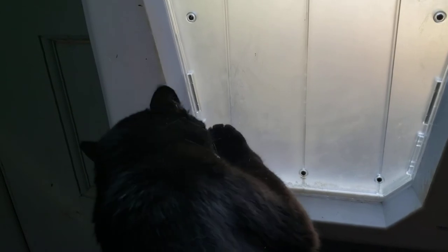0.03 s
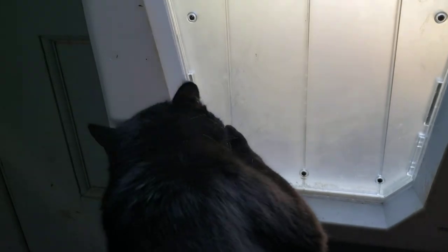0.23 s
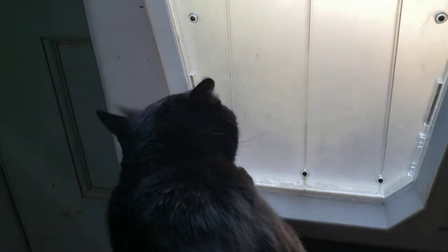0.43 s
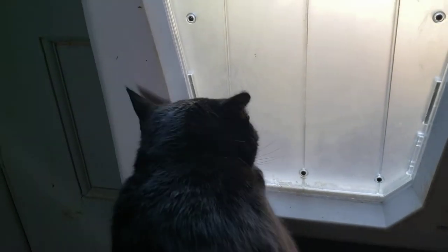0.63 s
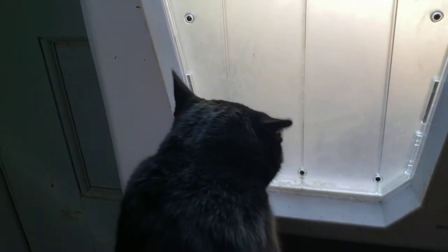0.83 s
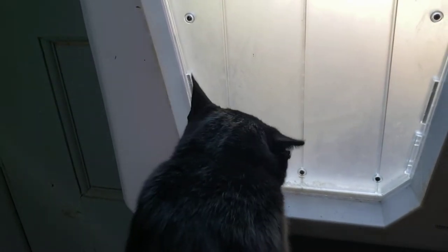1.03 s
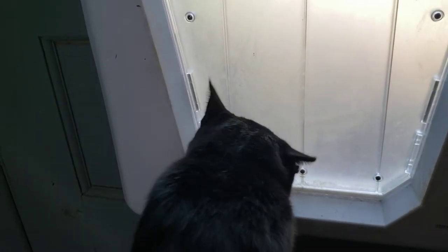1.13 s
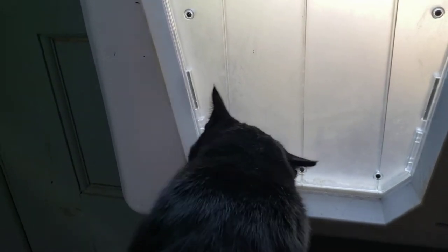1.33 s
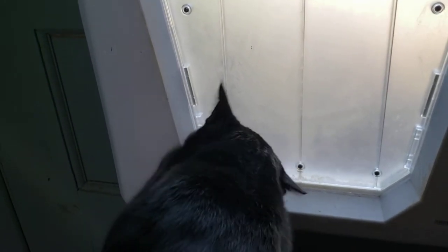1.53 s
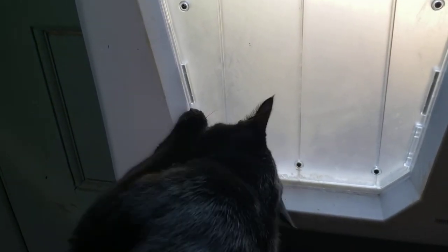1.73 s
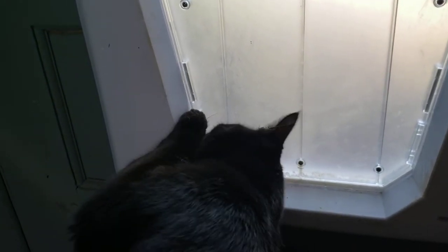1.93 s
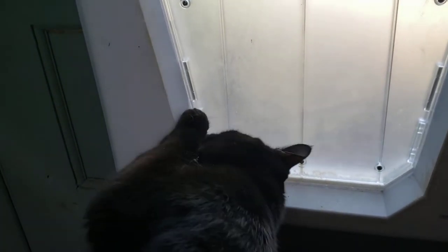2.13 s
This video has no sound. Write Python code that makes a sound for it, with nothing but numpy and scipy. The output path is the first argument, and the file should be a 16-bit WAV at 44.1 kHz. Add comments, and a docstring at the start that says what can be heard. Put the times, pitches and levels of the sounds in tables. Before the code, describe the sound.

A plastic pet door bangs and rattles as a cat paws at it, then knocks softly.

```python
"""A plastic pet door snaps and rattles against its frame as a cat paws at it, about a metre away.
Weaker knocks and scrapes of claws and pads follow, each one ringing the panel. The door around it
booms when weight lands on it, and plastic and pads squeak as they catch and slip. It all sits a little
to the left in a small hallway, over a low rumble, a hum and a faint hiss."""
import sys
import numpy as np
from scipy import signal
from scipy.fft import rfft, irfft, next_fast_len
from scipy.io import wavfile
from scipy.ndimage import uniform_filter1d

SR = 44100
rng = np.random.default_rng(int(sys.argv[2]) if len(sys.argv) > 2 else 0)


def master(y):
    """Save y as 16-bit WAV."""
    cut = np.clip(np.atleast_2d(y).T, -1, 1)
    pcm = np.round(cut * 32767)  # scale
    wavfile.write(sys.argv[1], SR, pcm.astype(np.int16))


N = 97020

# The five EQ points that voice a contact, in Hz: low, body, mid, treble, top.
CONTACT_BANDS_HZ = (330, 750, 1750, 5000, 13000)
# Hits on the panel. Each row: start in seconds, then low, body, mid, treble and top levels in dB.
KNOCKS = [ (0.2349, 21, -15, 3.5, 5.5, 16), (0.2368, 19, -1.5, 6.5, -4, 17.5), (0.2399, 20, 7, 8, 8, -6),
          (0.2521, 13, 11, 10.5, -0.5, -5), (0.2711, 16, -7, -12, -7, -16), (0.2840, 19, 0, -19, -6, -22),
          (0.529, -5, -13, -18, -16, -36), (0.741, 4, -21, -3, -15, -63), (0.834, 5.5, -3.5, 3.5, 1.5, -1),
          (0.8410, 0, -5, 4, -30, -29), (0.9352, -4, -5, -7, -8.5, -22), (1.006, -23, -5, -33, -14.5, -24),
          (1.0254, 0, -11.5, -27, -12.5, -16.5), (1.1224, 4, -16, -5.5, -8, -31),
          (1.37, -17, -18.5, -16.5, -13.5, -35), (1.389, -15.5, -14, -15, -15, -40),
          (1.6687, -10, -10.5, -1, -21, -35), (1.8835, -12, -12.5, -17, -27, -42),
          (2.01, -12.5, -46, -56, -27, -21), (2.0546, -18, -7.5, -8.5, -33, -36),
          (2.15, -9, -10.5, -12.5, -21, -32)]

def knocks():
    """The panel strikes its frame and claws strike the panel: a start and a force pulse for each hit."""
    blow = signal.unit_impulse(2048)
    return [(start, colour(blow, list(zip(CONTACT_BANDS_HZ, levels)))) for start, *levels in KNOCKS]


# Drags. Each row: start, swell and release in seconds, then low, body, mid, treble and top levels in dB.
SCRAPES = [ (0.246, 0.0018, 0.011, -12.5, -13.5, -13, -20, -16),
           (0.285, 0.088, 0.017, -50, -42, -25, -25, -41),
           (0.452, 0.0046, 0.038, -32.5, -31, -26, -39.5, -57),
           (0.524, 0.049, 0.039, -27.5, -28, -37.5, -33, -38.5),
           (0.646, 0.042, 0.04, -31, -28, -26, -37.5, -51.5),
           (0.709, 0.022, 0.056, -44, -25, -37.5, -48, -48),
           (0.827, 0.0029, 0.0097, -19.5, -41, -33, -36, -27.5),
           (0.869, 0.0082, 0.059, -29.5, -27.5, -24, -47.5, -70),
           (0.918, 0.01, 0.018, -20, -23, -37.5, -34, -41),
           (1.020, 0.054, 0.09, -46, -30.5, -33.5, -36.5, -53.5),
           (1.106, 0.0096, 0.033, -23, -25, -27.5, -34, -52.5),
           (1.200, 0.13, 0.15, -40, -44, -50.5, -50.5, -62),
           (1.430, 0.017, 0.11, -67, -73, -48, -56.5, -51.5),
           (1.654, 0.009, 0.1, -31, -36, -33, -47.5, -60.5),
           (1.74, 0.03, 0.089, -54.5, -45.5, -53.5, -54, -59),
           (1.877, 0.0081, 0.034, -33, -38, -43.5, -55, -64.5),
           (1.911, 0.0089, 0.01, -29.5, -37, -53, -74, -71),
           (2.040, 0.027, 0.035, -34, -36.5, -32, -51, -46.5),
           (2.137, 0.027, 0.04, -27.5, -39.5, -44, -52.5, -59)]
SLIPS_PER_S, SLIP_SCATTER_DB, RUB_SHARE = 900, 3, 0.56

def scrapes():
    """The panel grinds in its frame and the paw drags over it: tiny uneven slips over a smooth rub."""
    t = np.arange(SR // 3) / SR
    forces = []
    for start, swell, release, *levels in SCRAPES:
        slips = (rng.random(len(t)) < SLIPS_PER_S / SR) * rng.choice([-1, 1], len(t))
        slips = slips * undb(SLIP_SCATTER_DB * rng.standard_normal(len(t)))
        rub = rng.standard_normal(len(t))
        friction = np.sqrt(1 - RUB_SHARE) * slips / slips.std() + np.sqrt(RUB_SHARE) * rub
        pressure = np.interp(t, [0, swell, swell + release], [0, 1, 0])
        forces.append((start, colour(friction * pressure, list(zip(CONTACT_BANDS_HZ, levels)))))
    return forces


# The ring of the plastic. Each row: pitch in Hz, relative level in dB, time to fall 60 dB in seconds.
PANEL_MODES = [(278.8, 1.5, 0.7), (295.4, -7.5, 1), (331, -7, 0.3), (683, -3.5, 0.12), (783, 11, 0.093),
               (832, -11.5, 0.059), (956, -8, 0.66), (1438, 8, 0.24), (1518, -6, 0.23), (1668, 5, 0.067),
               (1808, 4.5, 0.076), (1930, 5.5, 0.078)]
# The plastic's tone on every knock and scrape. Each row: frequency in Hz, gain in dB.
PANEL_EQ = [(40, -20), (110, -7), (180, -7), (250, -6), (325, 2), (400, -6), (490, -0.5), (570, -4),
            (700, -2), (900, 5.5), (1200, -0.5), (1700, 1), (2300, 2), (3200, -3.5), (5000, -3.5),
            (7300, -1.5), (8100, -12), (10500, -7), (13000, -8.5), (15300, -3), (16200, -12.5)]
CLICK_DB, RING_DB, CHATTER_DB, ROOM_DB = -8.5, -57.5, -4.5, -7
CHATTER_T60_S, RIGHT_LAG_S = 0.042, 0.00007

def panel(contacts):
    """Each contact gives a click and a ring, plus chatter and reflections that vary with the spot."""
    out, t = np.zeros((2, N)), np.arange(SR // 2) / SR
    click = np.sinc((t - np.array([[0], [RIGHT_LAG_S]])) * SR)
    direct = undb(CLICK_DB) * click + undb(RING_DB) * ring(PANEL_MODES, t)
    chatter_decay = fade(t[:4096], CHATTER_T60_S)
    for (start, force), reflections in zip(contacts, hallway(t)):
        response = direct + undb(ROOM_DB) * reflections
        chatter = flatten(diffuse_noise(len(chatter_decay)) * chatter_decay)
        add(response, undb(CHATTER_DB) * chatter, 0)
        add(out, signal.fftconvolve(force[None], response, axes=1), start)
    return colour(out, PANEL_EQ)


# Weight landing on the door. Each row: start in seconds, level in dB.
THUMPS = [(0.236, -16), (0.52, -37.5), (0.846, -35.5), (1.118, -43.5), (1.881, -39)]
# The door's boom. Each row: pitch in Hz, relative level in dB, time to fall 60 dB in seconds.
DOOR_MODES = [(69.3, 0.5, 0.57), (56.95, -13.5, 0.85), (100, -6, 0.29), (120.5, 2, 0.11),
              (188.1, -3.5, 0.22), (223.6, -16, 0.28), (298, -16.5, 0.2), (337.4, -13.5, .2)]

def door(attack_s=0.019):
    """The whole door booms in its low modes when weight lands on it."""
    out, t = np.zeros(N), np.arange(SR) / SR
    boom = ring(DOOR_MODES, t) * (1 - np.exp(-t / attack_s))
    for start, db in THUMPS:
        add(out, undb(db) * boom, start)
    return out


# Short squeaks. Each row: start, swell and release in seconds, pitch in Hz, glide in Hz per second,
# level in dB.
SQUEAKS = [ (0.251, .011, .006, 715, 0, -20.5), (0.268, .007, .008, 940, 0, -29),
           (0.447, .003, .013, 1430, 1500, -39), (0.590, .060, .040, 302, 0, -47),
           (0.682, .010, .065, 940, -2800, -42), (0.828, .008, .065, 322, 0, -41),
           (0.832, .002, .022, 1950, 0, -36), (1.114, .010, .035, 3000, 0, -44)]

def squeaks(jitter=0.07, wander_s=0.0012, octave_db=-15.5):
    """Plastic and pads stick and slip at a jittering rate: rough tones with a little hallway on them."""
    out, t = np.zeros((2, N)), np.arange(SR // 8) / SR
    spots = hallway(np.arange(SR // 2) / SR)
    for (start, swell, release, hz, glide, db), reflections in zip(SQUEAKS, spots):
        wander = np.interp(t / wander_s, np.arange(256), rng.standard_normal(256))
        slip_hz = (hz + glide * t) * (1 + jitter * wander)
        phase = 2 * np.pi * np.cumsum(slip_hz) / SR
        envelope = np.interp(t, [0, swell, swell + release], [0, 1, 0])
        tone = undb(db) * envelope * (np.sin(phase) + undb(octave_db) * np.sin(2 * phase))
        add(out, tone, start)
        add(out, undb(ROOM_DB) * signal.fftconvolve(tone[None], reflections, axes=1), start)
    return out


# The hallway's tail. Each row: frequency in Hz, time to fall 60 dB in seconds.
HALLWAY_DECAY = [(150, 0.8), (700, 0.4), (2000, 0.39), (6000, 0.25), (14000, 0.24)]

def hallway(t, build_s=0.0073):
    """Yields diffuse reflections for one spot after another; they build fast and lose treble first."""
    spectrum, hz = rfft(diffuse_noise(2 * SR)), np.fft.rfftfreq(2 * SR, 1 / SR)
    centres, t60s = np.array(HALLWAY_DECAY).T
    band_gains = [curve_at(list(zip(centres, band)), hz) for band in np.eye(len(centres))]
    bands = np.array([irfft(spectrum * gain) for gain in band_gains])
    envelopes = fade(t, t60s[:, None]) * (1 - np.exp(-t / build_s))
    while True:
        offset = rng.integers(SR)
        tails = bands[..., offset:offset + len(t)] * envelopes[:, None]
        yield flatten(tails.sum(axis=0))


# Stereo width of diffuse sound. Each row: frequency in Hz, likeness of left and right from 0 to 1.
STEREO_LIKENESS = [(60, 0.9), (250, 0.86), (600, 0.62), (1300, 0.033), (5000, 0.023)]

def diffuse_noise(n):
    """Stereo white noise, narrow in the bass and wide in the treble."""
    mid, side = rfft(rng.standard_normal((2, n)))
    likeness = curve_at(STEREO_LIKENESS, np.fft.rfftfreq(n, 1 / SR))
    mid, side = mid * np.sqrt((1 + likeness) / 2), side * np.sqrt((1 - likeness) / 2)
    return irfft(np.array([mid + side, mid - side]), n)


# The bed of rumble. Each row: frequency in Hz, gain on white noise in dB.
RUMBLE_EQ = [(20, -30), (45, -24), (60, -28), (80, -27.5), (115, -30), (160, -44.5), (230, -43),
             (290, -38.5), (400, -52.5), (700, -61.5), (1400, -66), (2100, -51.5), (3300, -68.5),
             (5000, -72.5), (7000, -79), (15000, -74)]
# The hum. Each row: pitch in Hz, RMS level in dB.
HUM_TONES = [(59.5, -50.5), (123, -55)]
# The hiss's narrow tone. Each row: frequency in Hz, gain in dB.
HISS_EQ = [(700, -33.5), (1050, -2.5), (1250, 4), (1550, -14), (3000, -16), (12000, -28.5)]
# The fader ride on the hiss. Each row: time in seconds, gain in dB.
HISS_RIDE = [(1.08, -71), (1.2, -43.5), (1.55, -47), (1.68, -57)]

def background():
    """Steady low rumble and hum, with a faint hiss that swells and sinks back."""
    t = np.arange(N) / SR
    hum = sum(np.sqrt(2) * undb(db) * np.sin(2 * np.pi * (hz * t + rng.random())) for hz, db in HUM_TONES)
    hiss_db = np.interp(t, *np.array(HISS_RIDE).T)
    hiss = colour(diffuse_noise(N), HISS_EQ) * undb(hiss_db)
    rumble = colour(diffuse_noise(N), RUMBLE_EQ)
    return rumble + hum + hiss


def undb(db):
    """Decibels to gain."""
    return 10 ** (np.asarray(db) / 20)


def curve_at(points, hz):
    """Read (Hz, value) points on a log-frequency axis."""
    point_hz, values = np.array(points, float).T
    return np.interp(np.log(np.maximum(hz, 1)), np.log(point_hz), values)


def colour(x, points):
    """Minimum-phase EQ through the given (Hz, dB) points."""
    n = next_fast_len(x.shape[-1] // 2 + 2048) * 2
    gain = undb(curve_at(points, np.fft.rfftfreq(n, 1 / SR)))
    cepstrum = irfft(np.log(gain), n)
    cepstrum[1:n // 2] *= 2  # folded forward, so nothing rings ahead of a hit
    cepstrum[n // 2 + 1:] = 0
    return irfft(rfft(x, n) * np.exp(rfft(cepstrum)), n)[..., :x.shape[-1]]


def flatten(burst, width_hz=70):
    """Level the broad chance peaks and dips in a noise burst's spectrum and scale it to unit energy."""
    n = next_fast_len(burst.shape[-1] + 4096, True)
    spectrum = rfft(burst, n)
    power = uniform_filter1d(np.mean(np.abs(spectrum) ** 2, axis=0), size=int(width_hz * n / SR))
    flat = irfft(spectrum / np.sqrt(power + 1e-12), n)[:, :burst.shape[-1]]
    return flat / np.sqrt(np.mean(np.sum(flat ** 2, axis=-1)))


def fade(t, t60):
    """Exponential decay by 60 dB in t60 seconds."""
    return np.exp(-np.log(1000) * t / t60)


def ring(modes, t):
    """A struck body's modes, as a sum of fading sines."""
    return sum(undb(db) * np.sin(2 * np.pi * hz * t) * fade(t, t60) for hz, db, t60 in modes)


def add(out, x, start):
    """Mix x into out from a start time in seconds."""
    i = int(np.clip(start * SR, 0, N - 1))
    out[..., i:i + x.shape[-1]] += x[..., :N - i]


# Where the pet door sits in the stereo image. Each row: frequency in Hz, left minus right in dB.
PAN = [(60, 1.3), (250, 2), (600, 3.85), (1200, 2.37), (2000, 3.94), (6000, 3.44), (10000, -1)]

def scene():
    """Panel, door and squeaks, a little to the left, over the background."""
    left, right = panel(knocks() + scrapes()) + door() + squeaks()
    left = colour(left, [(hz, db / 2) for hz, db in PAN])
    right = colour(right, [(hz, -db / 2) for hz, db in PAN])
    return np.array([left, right]) + background()


LOW_CUT_HZ, HIGH_CUT_HZ = 30, 16000

def record(dry):
    """A gentle low cut trims the deepest rumble and a steep high cut takes off the very top."""
    low_cut = signal.butter(2, LOW_CUT_HZ, "high", fs=SR, output="sos")
    high_cut = signal.ellip(10, .2, 80, HIGH_CUT_HZ, fs=SR, output="sos")
    return signal.sosfilt(high_cut, signal.sosfilt(low_cut, dry))


dry = scene()
out = record(dry)
master(out)
```